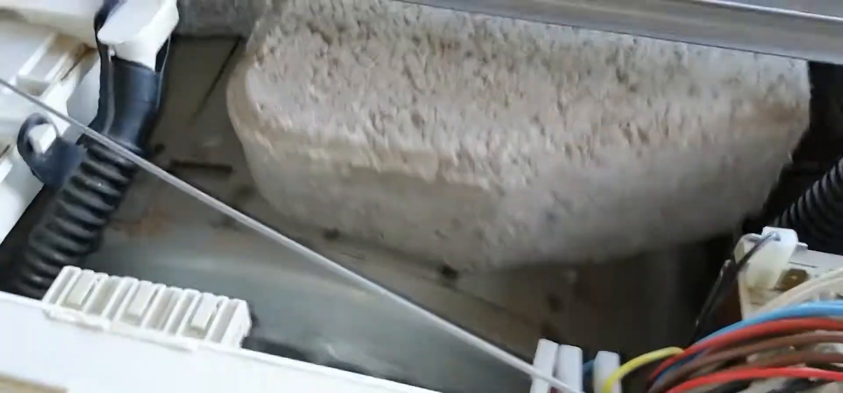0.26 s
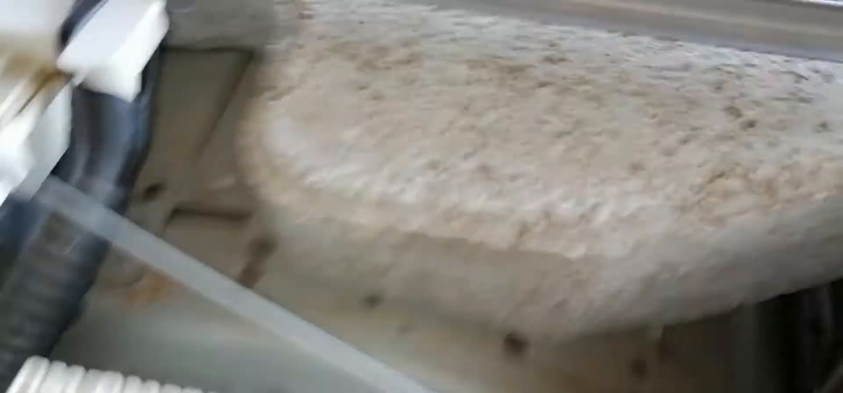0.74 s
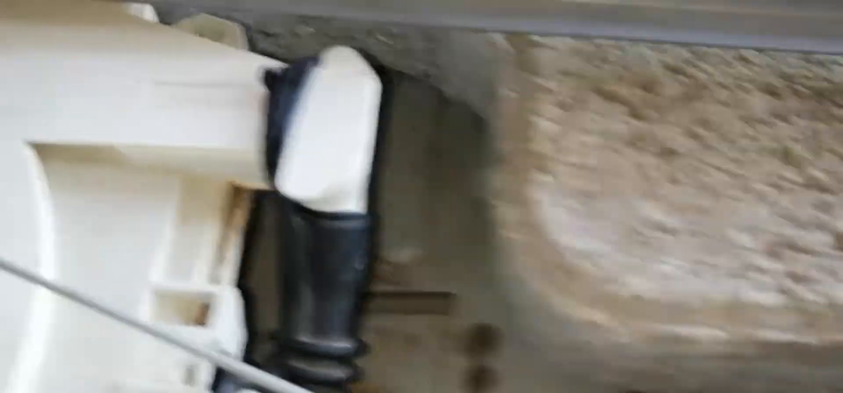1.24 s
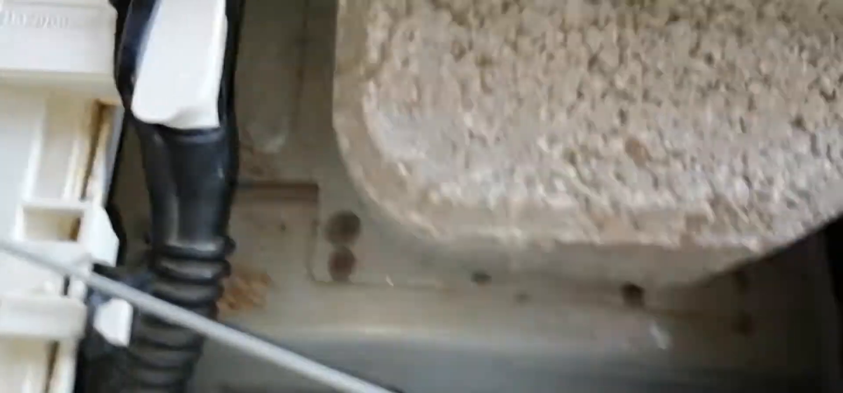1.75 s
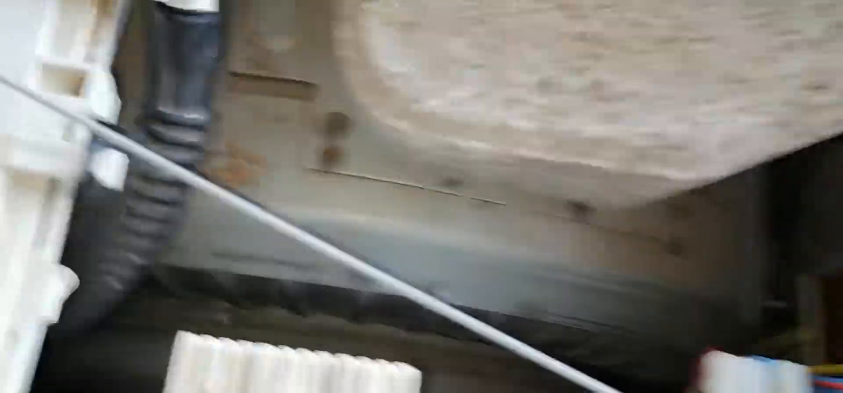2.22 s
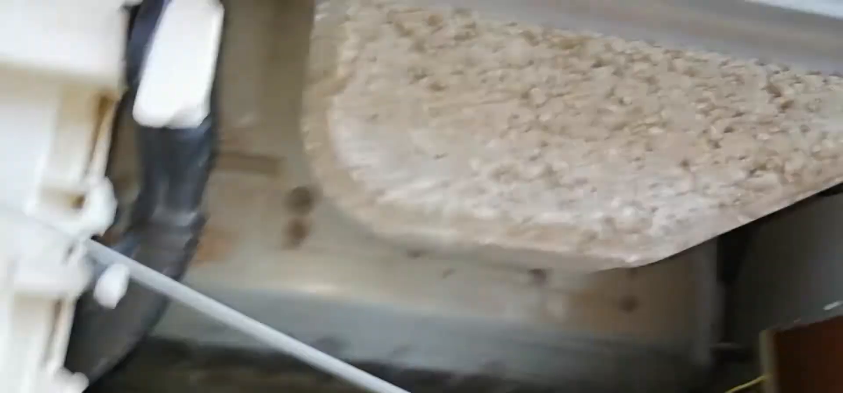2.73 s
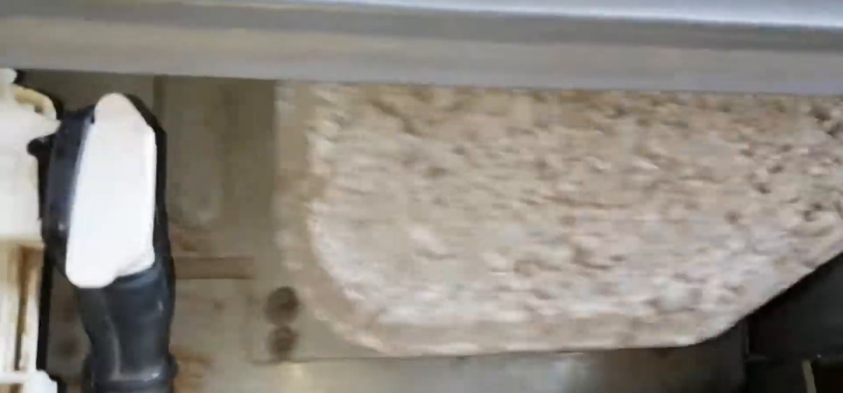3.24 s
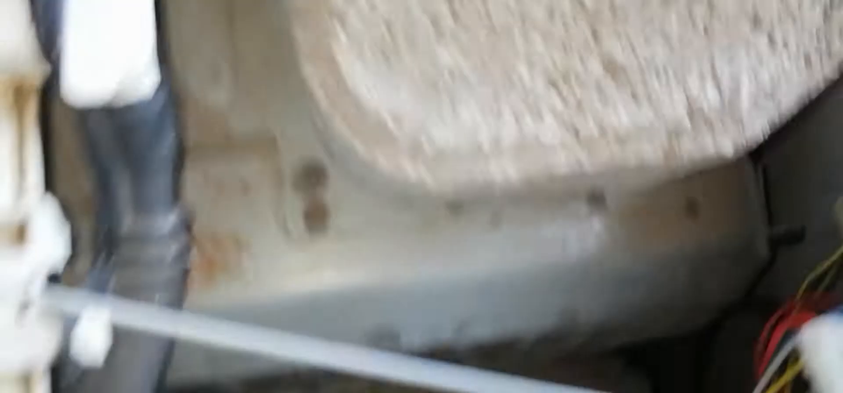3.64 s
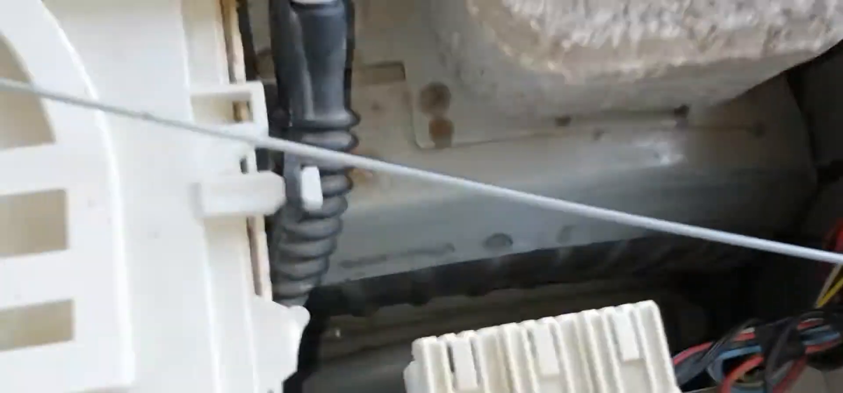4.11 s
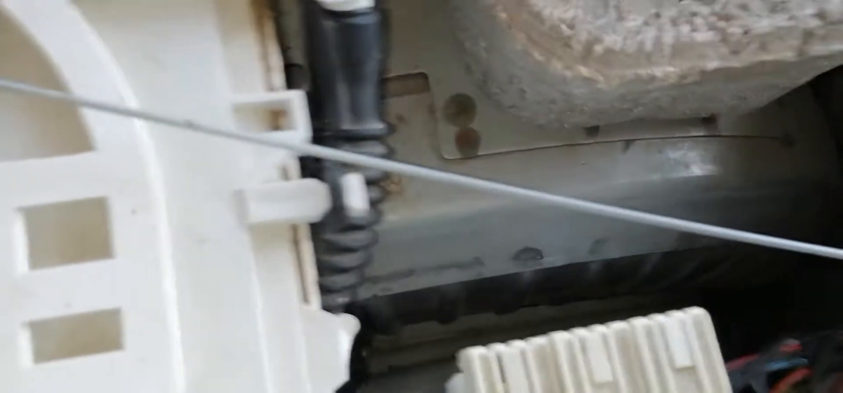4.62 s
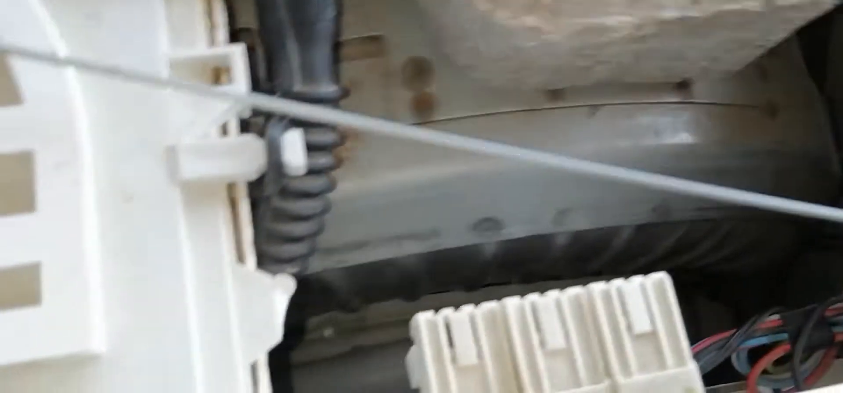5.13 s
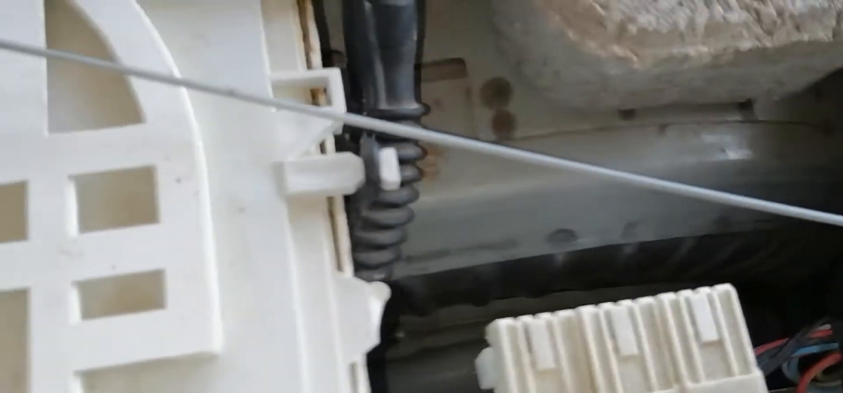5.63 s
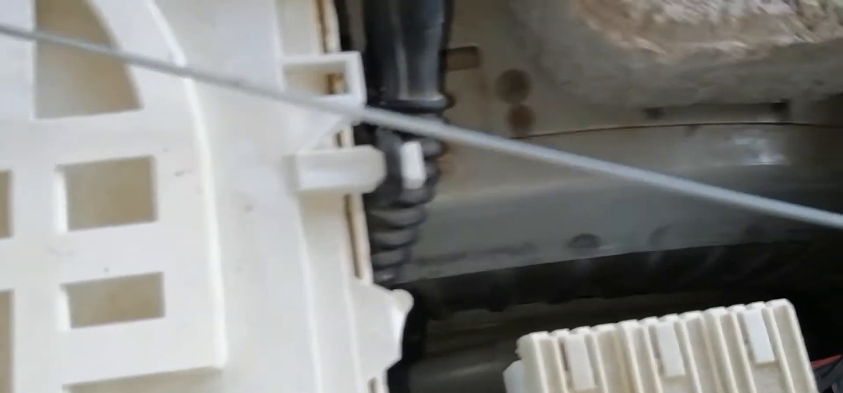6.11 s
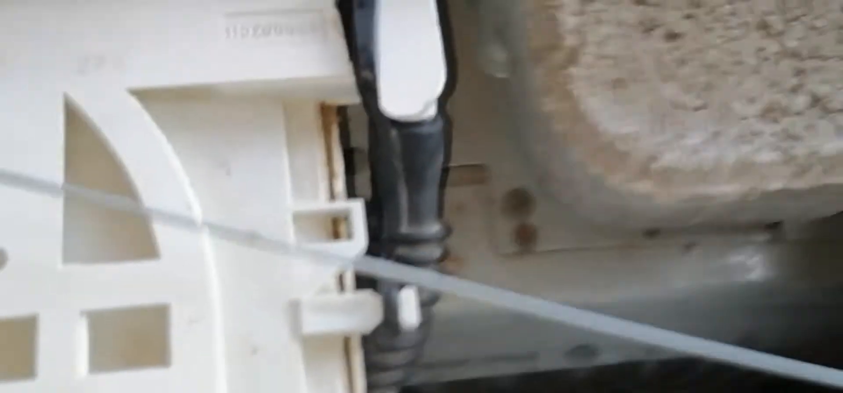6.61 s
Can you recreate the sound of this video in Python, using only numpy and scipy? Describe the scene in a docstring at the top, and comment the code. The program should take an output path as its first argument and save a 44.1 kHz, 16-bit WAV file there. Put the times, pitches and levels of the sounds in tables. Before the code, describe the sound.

Heard close from inside the cabinet, a washing machine drum spins with a steady rumble, a low motor hum and a faint hiss. The swinging tub first pounds out quick, rattling knocks that die down to light ticks. It then bumps a panel several times and drags along it in rough, squeaky surges with dull thumps. Finally the fast knocking comes back hard and gathers pace.

```python
"""Inside the cabinet of a washing machine, a load spins off balance. The swinging tub knocks on two
points of the housing in each turn. As it slows the knocks fade, and it bumps a side panel, then swings
wide and scrapes along it in loud surges. It speeds up and knocks again. Throughout, loose parts tick,
the drum rumbles, its bearings hiss and the motor hums."""
import sys
import numpy as np
from scipy import signal
from scipy.fft import rfft, irfft, next_fast_len
from scipy.io import wavfile
from scipy.ndimage import uniform_filter1d, map_coordinates

SR = 44100
rng = np.random.default_rng(int(sys.argv[2]) if len(sys.argv) > 2 else 0)


def int16_out(signal):
    """Quantize to a 16-bit WAV file."""
    q = np.round(np.clip(np.atleast_2d(signal).T, -1, 1) * 32767)
    wavfile.write(sys.argv[1], SR, q.astype(np.int16))


N = 302526
TIME = np.arange(N) / SR

# how far the tub swings towards the housing: t/s, swing/dB
TUB_SWING = [(0, -1.5), (.55, -1.5), (1.05, -1.5), (1.45, 0.5), (1.7, -0.5), (1.85, -8), (2.28, -6.5),
             (2.42, -10.5), (2.6, -14.5), (2.75, -15.5), (3.94, -16.5), (5.7, -15.5), (5.83, -10),
             (5.97, -0.5), (6.24, 1.5), (6.5, 4.5), (6.63, 2.5), (6.86, 3)]
# the swing needed to reach each of the two points: swing/dB
REACH_DB = [-9.5, -15]
# a knock's four parts (thump, body, clack, rattle): lowest f/Hz, highest f/Hz
PART_BANDS = [(150, 380), (380, 1400), (1400, 3500), (4200, 9000)]
# their base levels, a row per point: thump/dB, body/dB, clack/dB, rattle/dB
PART_LEVELS = [(-29, -31, -36.5, -41), (-32, -33.5, -37, -46)]
# what each gains from a wider swing, same layout: growth/(dB per dB)
PART_GROWTH = [(1.64, 0.84, 0.15, 1.74), (0.3, 0.65, 0.044, 0.27)]
# the knocks' tone drifts slowly over time, a list per point: t/s, thump/dB, clack/dB, rattle/dB
TONE_DRIFT = [
    [(0, 3, -2.5, -0.5), (.4, -2.5, 0.5, 1.5), (.75, 1, -0.5, -3.5), (1.05, -3, -1.5, 2.5),
     (1.44, 2.5, 3, -5.5), (1.7, 2.5, -1, -6), (2, 3.5, -1, 4.5), (2.27, 2, 2.5, -7), (2.45, 6, 12, -5),
     (5.83, 7, 12, 12), (5.97, -1, -3, -9.5), (6.24, 3.5, -0.5, -6), (6.5, -0.5, 1.5, -10.5),
     (6.62, -2, -2, -10), (6.75, -8.5, -5, -9)],
    [(0, -8, -2.5, .5), (.5, -6, -1, 0), (1, 0.5, -1, 0.5), (1.35, 6, -0.5, 0.5), (1.7, -5, -2, 2.5),
     (2, 1, -0.5, -2), (2.5, 4.5, 3, 0), (5.8, 6, -3.5, -4), (6.3, 7.5, 0.5, -5.5), (6.5, 9, -1, -2),
     (6.65, 2, -3, -8), (6.8, 3, -2, -6)],
]
# a dip that makes the knocks sound hollow: t/s, f/Hz, depth/dB
HOLLOW_DIP = [(0, 1480, 6), (.4, 1570, 2), (1, 1560, 9), (1.4, 1340, 7), (1.9, 1300, -0.5),
              (2.4, 1400, 4.5), (5.8, 1480, 1.5), (6.4, 1320, 5), (6.86, 1880, 0)]
def knocks(drift_per_s=0.749, thud_hz=(231.3, 270.5), rebound_s=0.076, restrike_s=0.017):
    """The tub hits the same two points, so knocks repeat closely. A wider swing hits harder."""
    out = np.zeros(N + SR)
    rings = np.array([[housing_ring(wash_db=-5, spread_db=3) for _ in range(8)] for _ in range(2)])
    t = np.arange(rings.shape[-1]) / SR
    punch = [0.35, 2.3, 1.5, 0.18]  # how far each part's first blow stands above its ring
    rise_s = [0.0019, 0.0038, 0.0039, 0.0009]
    sized = lambda x: x / np.std(x[:SR // 40])  # level set by the first 25 ms
    thuds = [sized(band(np.sin(2 * np.pi * hz * t) * fade(t, 0.077), 150, 1500)) for hz in thud_hz]
    controls = np.array(curves(TUB_SWING) + curves(HOLLOW_DIP) + curves(SWISH_PATH)[:1])
    tone = [np.array(curves(rows)) for rows in TONE_DRIFT]
    for s, point in blows():
        start = round(s * SR)
        swing_db, dip_hz, dip_db, swish_hz = controls[:, start]
        thump_db, clack_db, rattle_db = tone[point][:, start]
        # one ring slowly blends into the next
        which, blend = divmod(np.clip(s * drift_per_s, 0, 6), 1)
        angle = blend * np.pi / 2
        ring = np.cos(angle) * rings[point, int(which)] + np.sin(angle) * rings[point, int(which) + 1]
        ring += 0.24 * housing_ring(wash_db=5.5, spread_db=4.5)  # no two blows are quite alike
        colour = lambda hz: amp(2.5 * bump(hz, swish_hz, 0.32) - dip_db * bump(hz, dip_hz, 0.27))
        ring = filtered(ring, colour)
        ring += singing(ring, point, s)
        touch = 1 / (1 + np.exp((REACH_DB[point] - swing_db) / 0.5))  # a small swing misses
        softness = 2 ** (-np.clip(swing_db, -1, 4) / 5.5)  # a wide swing gives a sharper start
        levels_db = np.add(PART_LEVELS[point], [thump_db, 0, clack_db, rattle_db])
        levels_db += np.multiply(PART_GROWTH[point], swing_db)
        gains = touch * amp(levels_db + 1.54 * rng.standard_normal(len(PART_BANDS)))
        parts = []
        for k, edges in enumerate(PART_BANDS):
            blow = (1 + punch[k] * np.exp(-t / 0.0055)) * rise(t, softness * rise_s[k])
            parts.append(sized(band(ring[::-1], *edges)[::-1] * blow))  # backwards: no late start
        parts[0] = sized(parts[0] + amp(1.5) * thuds[point])  # the tub's own thud joins the thump
        thump, body, clack, rattle = gains[:, None] * parts
        add(out, s, thump + body + clack + rattle + chatter(body + clack + 0.5 * rattle))
        if point == 0:  # touched again, more dully
            add(out, s + restrike_s, amp(0.5) * (body + 0.5 * clack) * fade(t, 0.061))
        # the tub falls back on its dampers
        add(out, s + rebound_s, gains[0] * amp(-7) * thuds[point] * rise(t, 0.002))
    return out[:N]


# spells of knocking: start/s, end/s, starting speed/(turns per s), change/(turns per s per s)
KNOCK_SPELLS = [(.0455, 2.8, 8.372, -.662), (5.692, 6.8, 7.085, .87)]
def blows(lag_s=0.031):
    """The time and point of each blow: two per turn, as the drum slows or speeds up evenly."""
    for start, end, speed, change in KNOCK_SPELLS:
        age = np.arange(0, end - start, 1 / SR)
        turns = speed * age + change * age ** 2 / 2
        for s in np.interp(np.arange(turns[-1]), turns, start + age):
            yield s, 0
            yield s + lag_s, 1


# the notes the housing rings at: f/Hz, level/dB
HOUSING_NOTES = [(207, -5), (233, 5.5), (274, -7), (320, -4.5), (500, -3.5), (628, -5), (684, -4),
                 (834, -3), (950, -4), (1102, -2.5), (1235, -6.5), (1438, -36), (1560, -13.5),
                 (1655, -15.5), (1918, -15.5), (2010, -16), (2180, -14.5), (2465, -27), (2590, -38.5),
                 (2880, -28), (3050, -18.5), (3320, -28.5), (4480, -25.5), (4950, -18), (5356, -25.5),
                 (6132, -39)]
# the noisy wash between those notes: f/Hz, level/dB
WASH_COLOUR = [(88, -66), (150, -43), (234, -5.5), (385, -14), (658, -13), (762, -13), (960, -7.5),
               (1380, -19), (1650, -23), (1790, -23.5), (3800, -24.5), (5040, -32), (7000, -35),
               (7600, -46.5), (9880, -73), (16700, -120)]
# how long the wash takes to fall 60 dB (the notes last a little longer): f/Hz, t/s
RING_TIMES = [(200, 0.47), (500, 0.31), (1000, 0.18), (2500, 0.14), (6000, 0.055)]
def housing_ring(wash_db, spread_db, contact_s=0.014):
    """The struck housing rings with clear notes over a wash, dying once the tub lets go."""
    t = np.arange(SR // 4) / SR
    fall_db = lambda s, hz: 60 * np.maximum(s - contact_s, 0) / along(RING_TIMES, hz)
    notes = 0
    for hz, db in HOUSING_NOTES:
        luck, phase = rng.standard_normal(2)
        notes += amp(db + spread_db * luck - fall_db(t, hz) / 1.07) * np.sin(2 * np.pi * (hz * t + phase))
    hz, s, slices = signal.stft(coloured(rng.standard_normal(len(t)), WASH_COLOUR), SR, nperseg=256)
    ripple_db = 5 * rng.standard_normal((len(hz), 1)) * np.clip(hz / 1500, 0, 1)[:, None]
    wash = signal.istft(slices * amp(ripple_db - fall_db(s, hz[:, None])), SR, nperseg=256)[1]
    return unit(notes) + amp(wash_db) * unit(wash[:len(t)])


# notes that stand out: point (0 or 1), from t/s, to t/s, f/Hz, level/dB against the octave around it
SINGING_NOTES = [(0, 0, 1.24, 1115, -2.5), (0, 0, 1.79, 965, -6), (0, 0, 1.24, 640, -7),
                 (0, 0, 1.24, 540, -8), (0, 0, 1.24, 1945, -4), (0, 0, .96, 3520, -4),
                 (0, .24, .6, 2600, -5), (0, 1.24, 1.79, 1690, -3), (0, 1.24, 1.79, 680, -5),
                 (0, 1.11, 1.64, 3070, -6), (0, 1.11, 1.51, 3330, -6), (0, 1.38, 2.06, 2340, -5),
                 (0, 1.38, 1.76, 4260, -4), (0, 1.8, 2.36, 1620, 1), (0, 5.79, 6.69, 965, -4),
                 (0, 5.79, 6.69, 3070, -5), (0, 6.05, 6.66, 1690, -6), (0, 6.05, 6.66, 680, -6),
                 (0, 6.05, 6.66, 1920, -6), (0, 6.05, 6.66, 2880, -7), (0, 5.9, 6.05, 1560, -1),
                 (0, 6.69, 6.86, 1230, -8), (0, 6.69, 6.86, 1410, -9), (1, 0, .96, 2500, -2),
                 (1, 0, 1.64, 4250, -7), (1, .51, 1.79, 650, -6), (1, 1.01, 1.79, 2170, -2),
                 (1, 1.24, 1.79, 2980, -5), (1, 1.24, 1.64, 4980, -4), (1, 2.11, 2.66, 2900, -3),
                 (1, 2.24, 2.66, 3850, -7), (1, 2.24, 2.81, 2480, -5), (1, 5.69, 6.86, 2490, -6),
                 (1, 5.79, 6.86, 3020, -7), (1, 5.79, 6.69, 2180, -4)]
# how long they take to fall 60 dB: f/Hz, t/s
SINGING_TIMES = [(700, 0.29), (1900, 0.11), (2180, 0.21), (2500, 0.11), (5000, 0.1)]
def singing(ring, point, s):
    """Some of the cabinet's notes sing out in the knocks only during certain stretches of time."""
    t = np.arange(len(ring)) / SR
    hz = np.fft.rfftfreq(len(ring), 1 / SR)
    power = 2 * np.abs(rfft(ring)) ** 2 / len(ring)
    out = np.zeros(len(ring))
    for which, start, end, note_hz, db in SINGING_NOTES:
        if which == point and start <= s < end:
            detune, luck, phase = rng.standard_normal(3)
            tone = np.sin(2 * np.pi * (note_hz * (1 + 0.0055 * detune) * t + phase))
            tone *= fade(t, along(SINGING_TIMES, note_hz)) * rise(t, 0.0022)
            octave_size = np.sqrt(power[np.abs(np.log2((hz + 1) / note_hz)) < 0.5].sum())
            out += amp(db + 2.3 * luck) * octave_size * tone / np.linalg.norm(tone)
    return out


def chatter(knock, count=4, within_s=0.075):
    """A blow shakes the housing against its fittings, so a few small, short hits follow."""
    short = knock * fade(np.arange(len(knock)) / SR, 0.064)
    out = np.zeros(len(knock))
    for k, (when, size) in enumerate(rng.random((count, 2))):
        delay = within_s * (k + when) / count
        add(out, delay, amp(-9 - 105 * delay + 6 * (size - 0.5)) * short)
    return out


# drags along a side panel: hardest press t/s, length/s, groan f/Hz, level/dB, squeak f/Hz, level/dB
DRAGS = [(4.453, 0.066, 630, -32, 1420, -34.5), (4.63, 0.069, 700, -29.5, 1480, -36.5),
         (4.737, 0.025, 707, -27.5, 1490, -34.5), (4.809, 0.058, 530, -27.5, 1530, -32),
         (4.897, 0.054, 690, -23, 1760, -35.5), (4.984, 0.058, 680, -24.5, 1450, -31),
         (5.076, 0.054, 700, -23.5, 2100, -33.5), (5.162, 0.058, 603, -25, 1430, -32.5),
         (5.267, 0.069, 533, -23.5, 1490, -35.5), (5.364, 0.02, 500, -40, 1450, -41),
         (5.466, 0.024, 620, -32, 1400, -56)]
def scrapes(slips_per_s=260, grit=0.64):
    """The tub sticks and slips along the panel; the jerks ring it as the pressure swells and falls."""
    out, t = np.zeros(N), np.arange(-SR // 7, SR // 7) / SR
    slip_rate = slips_per_s * np.exp(0.5 * wobble(slips_per_s / 2))
    slips = np.diff(np.floor(np.cumsum(slip_rate) / SR), prepend=0) * amp(4 * wobble(150))
    jerks = unit(band(slips, 240, 14000)) + grit * rng.standard_normal(N)
    catches = unit(amp(2.6 * wobble(170)))  # coarser catches make the level shudder
    for s, length, groan_hz, groan_db, squeak_hz, squeak_db in DRAGS:
        span = round(s * SR) + np.arange(len(t)) - len(t) // 2
        press = np.hanning(len(t)) / np.sqrt(1 + np.abs(2 * t / length) ** 4.5)
        groan, squeak = side_panel(jerks[span], groan_hz, squeak_hz)
        groan, squeak = amp(groan_db) * groan, amp(squeak_db) * squeak
        # the squeak needs more pressure than the groan
        out[span] += press * (groan * np.sqrt(catches[span]) + np.sqrt(press) * squeak * catches[span])
        # the low and middle notes ring on as the tub lets go
        tail = filtered(groan + 0.5 * squeak, lambda hz: 1 / (1 + (hz / 1900) ** 10))
        tail *= fade(np.maximum(t - length / 2, 0), 0.2)
        out[span] += amp(-15) * tail * (1 - press) * (t > 0)
    return out


# the notes the side panel rings at: f/Hz, width/Hz, level/dB
PANEL_NOTES = [(348, 310, -8), (478.6, 44, 2), (621, 37, -5), (785, 42, 1.5), (1000, 82, -7.5),
               (1285, 66, -3), (1530, 190, -13), (1652, 19, -4), (1809, 48, -10.5), (2384, 103, -11),
               (2710, 110, -21), (3280, 230, -21), (4680, 380, -30)]
# its rough rasp: f/Hz, level/dB
RASP_COLOUR = [(88, -64), (150, -44), (271, 22), (474, 3), (567, -38), (788, -10.5), (929, -7),
               (1650, -15.5), (1760, -22.5), (2370, 0), (3300, -14.5), (7600, -62.5), (9880, -99),
               (16700, -120)]
def side_panel(push, low_hz, high_hz):
    """The panel's low and high ring, each at an even level; the spot touched favours some notes."""
    chance = rng.standard_normal((len(PANEL_NOTES), 2))
    notes = [(hz * (1 + 0.012 * detune), width, db + 2.5 * luck)
             for (hz, width, db), (detune, luck) in zip(PANEL_NOTES, chance)]
    ring = unit(resonate(push, notes)) + amp(-5.5) * coloured(push, RASP_COLOUR)
    low = filtered(band(ring, 230, 1050), lambda hz: amp(-8 * np.abs(np.log2((hz + 1) / low_hz))))
    high = filtered(band(ring, 1250, 9000), lambda hz: amp(6 * bump(hz, high_hz, 0.42)))
    return evened(low), evened(high)


# single panel notes during the drags: t/s, f/Hz, level/dB
HOWL_NOTES = [(4.455, 414, -33.5), (4.455, 522, -36), (4.455, 812, -33.5), (4.465, 1641, -34),
              (4.635, 812, -35), (4.64, 1257, -33), (4.635, 1652, -33), (4.741, 333, -36.5),
              (4.741, 780, -29), (4.803, 481, -27), (4.815, 780, -29), (4.81, 1396, -36), (4.89, 384, -38),
              (4.9, 444, -34), (4.912, 804, -28.5), (4.905, 1022, -31.5), (4.986, 468, -30),
              (4.99, 616, -38), (4.993, 785, -34.5), (5.075, 473, -30), (5.085, 624, -28),
              (5.088, 724, -30), (5.088, 783, -33), (5.165, 438, -40), (5.172, 624, -30.5),
              (5.255, 465, -22.5), (5.275, 621, -38), (5.285, 796, -38)]
def howls(swell_s=0.019, ring_times=((450, 0.24), (1250, 0.17), (1650, 0.09))):
    """Each drag presses on another spot, so other panel notes swell roughly and ring out."""
    out, t = np.zeros(N), np.arange(-SR // 10, SR // 5) / SR
    waver_hz, rough = 13 * wobble(90), amp(2.5 * wobble(140))
    swell = np.exp(-(np.minimum(t, 0) / swell_s) ** 2)
    for s, hz, db in HOWL_NOTES:
        span = round(s * SR) - SR // 10 + np.arange(len(t))
        pitch_hz = hz + waver_hz[rng.integers(N - len(t)):][:len(t)]
        tone = np.sqrt(2) * np.sin(2 * np.pi * (np.cumsum(pitch_hz) / SR + rng.random()))
        ring_out = fade(np.maximum(t - swell_s / 2, 0), along(ring_times, hz))
        out[span] += amp(db) * swell * ring_out * rough[span] * tone
    return out


# hard catches during the drags: t/s, level/dB, f/Hz
HARD_CATCHES = [(4.824, -28, 800), (4.887, -18, 480), (4.905, -19.5, 760), (4.918, -23.5, 790),
                (4.994, -24, 560), (5.071, -16, 450), (5.086, -19, 720), (5.141, -24, 1000),
                (5.185, -17.5, 680), (5.253, -16, 470)]
def jolts():
    """The tub catches hard: a short, dull thump with a little crack on top."""
    out, t = np.zeros(N), np.arange(SR // 16) / SR
    for s, db, centre_hz in HARD_CATCHES:
        colour = lambda hz: bump(hz, centre_hz, 1) + 0.098 * bump(hz, 1800, 0.91)
        ring = evened(filtered(rng.standard_normal(len(t)), colour), samples=300)
        add(out, s, amp(db) * ring * fade(t, 0.04) * rise(t, 0.0025))
    return out


# bumps on the side panel: t/s, low ring level/dB, high ring level/dB
PANEL_TAPS = [(3.396, -28, -37.5), (3.555, -30.5, -38.5), (3.715, -29.5, -34.5), (3.878, -27.5, -36),
              (4.383, -24.5, -34.5), (4.558, -29, -35.5), (4.712, -48, -36), (5.443, -26, -36.5)]
def taps():
    """The slower tub bumps the panel and lets it ring out."""
    out, t = np.zeros(N), np.arange(SR // 3) / SR
    for s, low_db, high_db in PANEL_TAPS:
        low, high = side_panel(rng.standard_normal(len(t)), low_hz=710, high_hz=1750)
        add(out, s, (amp(low_db) * low + amp(high_db) * high) * fade(t, 0.16) * rise(t, 0.0042))
    return out


# the clearer clicks of loose parts: t/s, level/dB, f/Hz
CLEAR_CLICKS = [(0.476, -37, 1800), (.488, -33, 1480), (1.497, -43, 6500), (2.403, -43, 3000),
                (2.548, -46, 4200), (2.691, -43.5, 3340), (2.839, -48, 3800), (2.984, -57, 5200),
                (3.138, -51, 2600), (3.941, -42.5, 2960), (3.949, -35, 1800), (4.129, -63, 3600),
                (4.978, -42, 6800)]
def loose_parts(ticks_per_s=15):
    """Fasteners and wires shaken by the tub: a few clear clicks among faint random ticks."""
    out, t = np.zeros(N), np.arange(SR // 20) / SR
    hz = np.fft.rfftfreq(len(t), 1 / SR)
    ticks = [(when * N / SR, -60 - 2.5 * np.log(1 - 0.97 * size), 3900 * 2 ** (1.6 * (pitch - 0.5)))
             for when, size, pitch in rng.random((int(ticks_per_s * N / SR), 3))]
    for s, db, centre_hz in CLEAR_CLICKS + ticks:
        colour = bump(hz, centre_hz, 0.51) + 0.12 * (hz > 1200)
        ring = unit(irfft(rfft(rng.standard_normal(len(t))) * colour, len(t)))
        add(out, s, amp(db) * ring * fade(t, 0.031))
    return out


# light touches on the tub: t/s, level/dB
LIGHT_TOUCHES = [(2.74, -63), (2.89, -62.5), (3.05, -63.5), (3.19, -62), (3.35, -66), (3.52, -66),
                 (4.34, -62)]
def brushes():
    """Something light brushes the turning tub, making short, grainy swells of high hiss."""
    hiss = unit(filtered(rng.standard_normal(N), lambda hz: bump(hz, 5050, 0.16)))
    swells = sum(amp(db) * np.exp(-((TIME - s) / 0.03) ** 2) for s, db in LIGHT_TOUCHES)
    return hiss * swells * amp(4 * wobble(160))


# a swish that sinks as the drum slows: t/s, f/Hz, base level/dB
SWISH_PATH = [(0, 5630, -61), (.8, 6340, -63.5), (1.2, 4900, -62.5), (1.5, 4530, -60.5), (1.9, 4680, -61),
              (2.25, 3330, -52.5), (2.6, 2910, -57.5), (3, 2600, -72)]
def swish(width_octaves=0.16, settle_s=0.035):
    """A narrow band of hiss slides down and fades; each blow stirs it up."""
    hz, s, slices = signal.stft(rng.standard_normal(N), SR, nperseg=256)
    centre_hz, level_db = curves(SWISH_PATH)
    octaves = np.log2((hz[:, None] + 1) / np.interp(s, TIME, centre_hz))
    hiss = signal.istft(slices * np.exp(-0.5 * (octaves / width_octaves) ** 2), SR, nperseg=256)[1][:N]
    kicks = np.bincount([round(s * SR) for s, point in blows()], minlength=N)[:N]
    stirred = amp(-7) + 2 * signal.lfilter([1], [1, -np.exp(-1 / (settle_s * SR))], kicks)
    return unit(hiss) * stirred * amp(level_db + 3 * wobble(34))


# the noise of the running drum: f/Hz, level/dB
DRUM_COLOUR = [(13, -32.5), (22, -10), (35, -10.5), (64, -7), (125, 8.5), (172, -2), (273, -9.5),
               (366, -13), (445, -11), (569, -14.5), (951, -20.5), (1180, -32.5), (1930, -44),
               (2290, -38.5), (3830, -51.5), (5270, -48.5), (7600, -50), (9880, -78), (16700, -120)]
# its deep sounds: t/s, sway level/dB, drone base level/dB (the motor follows this too)
DEEP_LEVELS = [(0.0, -63.5, -33.5), (0.07, -50, -45), (0.57, -53.5, -47.5), (1.09, -61, -37),
               (1.76, -49.5, -40), (2.98, -46, -38.5), (3.92, -53, -40), (4.41, -50.5, -46),
               (4.87, -54, -34), (4.91, -55, -42), (5.79, -45.5, -37), (6.86, -72, -38.5)]
# its higher sounds: t/s, rumble level/dB, hiss level/dB
RUNNING_LEVELS = [(0, -43, -49.5), (.8, -43.5, -51), (1.6, -40, -52.5), (2.4, -43.5, -51.5),
                  (3, -39.5, -52.5), (3.7, -42, -54), (4.3, -41.5, -53.5), (4.7, -41, -53),
                  (5.2, -38.5, -51.5), (5.55, -35.5, -51), (5.9, -39, -49), (6.4, -36.5, -52),
                  (6.86, -41.5, -51)]
def drum():
    """The turning drum sways, drones and rumbles while its bearings and belt hiss."""
    sway_db, drone_db = curves(DEEP_LEVELS)
    rumble_db, hiss_db = curves(RUNNING_LEVELS)
    noise = lambda lo, hi: unit(band(coloured(rng.standard_normal(N), DRUM_COLOUR), lo, hi))
    flutter = wobble(25)  # shared by rumble and hiss
    sway = amp(sway_db) * noise(22, 64)
    drone = amp(drone_db - 2.5) * noise(80, 165)
    housing = unit(resonate(noise(190, 770), [(hz, 28, db / 2) for hz, db in HOUSING_NOTES]))
    rumble = amp(rumble_db + 2 * flutter) * (noise(239, 1700) + amp(-6.5) * housing)
    hiss = amp(hiss_db + 0.4 * flutter + 1.5 * wobble(90)) * noise(1216, 7500)
    return sway + drone + rumble + hiss


# the motor's hum: f/Hz, level/dB against the drone base level
HUM_NOTES = [(53, -18.5), (118, -9.5), (198, -9.5), (232, -16), (274, -9.5)]
def motor(waver_hz=2.31, throb_db=5):
    """The motor hums with low notes that waver under the uneven load."""
    hum = 0
    for hz, db in HUM_NOTES:
        level = amp(db + throb_db * wobble(12))
        hum += level * np.sin(2 * np.pi * np.cumsum(hz + waver_hz * wobble(9)) / SR)
    return hum * amp(curves(DEEP_LEVELS)[1])


def amp(db):
    """Turns decibels into a number to multiply by."""
    return 10 ** (np.asarray(db) / 20)


def unit(x):
    """Scales x to an average (rms) level of 1."""
    return x / np.sqrt(np.mean(x ** 2) + 1e-20)


def evened(x, samples=700):
    """Evens out quick changes in level."""
    return x / np.sqrt(np.abs(uniform_filter1d(x ** 2, samples)) + 1e-12)


def fade(t, fall_s):
    """Dies away by 60 dB every fall_s seconds."""
    return amp(-60 * t / fall_s)


def rise(t, rise_s):
    """Climbs smoothly from 0 towards 1."""
    return 1 - np.exp(-t / rise_s)


def add(out, s, sound):
    """Mixes a sound into out, starting at s seconds."""
    span = out[round(s * SR):][:len(sound)]
    span += sound[:len(span)]


def curves(rows):
    """One value per sample for each column after the time."""
    s, *columns = np.transpose(rows)
    return [np.interp(TIME, s, column) for column in columns]


def along(points, hz):
    """Reads between (f/Hz, value) points, spaced by pitch."""
    f, values = np.transpose(points)
    return np.interp(np.log(hz + 1), np.log(f + 1), values)


def bump(hz, centre_hz, octaves):
    """A bell-shaped hill around one pitch."""
    return np.exp(-(np.log2((hz + 1) / centre_hz) / octaves) ** 2)


def wobble(rate):
    """A smooth curve through `rate` random values a second."""
    return map_coordinates(rng.standard_normal(int(N * rate / SR) + 4), [TIME * rate])


def filtered(x, response):
    """Multiplies each frequency in x by response(hz)."""
    n = x.shape[-1]
    padded = next_fast_len(n + SR // 2)
    return irfft(rfft(x, padded) * response(np.fft.rfftfreq(padded, 1 / SR)), padded)[..., :n]


def coloured(x, spectrum):
    """Shapes x by (f/Hz, level/dB) points, then scales it to level 1."""
    return unit(filtered(x, lambda hz: amp(along(spectrum, hz))))


def resonate(x, notes):
    """Makes x ring at (f/Hz, width/Hz, level/dB) notes."""
    peak = lambda f, hz, width: 1j * f * width / (hz * hz - f * f + 1j * f * width)
    return filtered(x, lambda f: sum((-1) ** k * amp(db) * peak(f, hz, width)
                                     for k, (hz, width, db) in enumerate(notes)))


def band(x, lo, hi):
    """Keeps the frequencies between lo and hi."""
    return signal.sosfilt(signal.butter(4, [lo, hi], 'band', fs=SR, output='sos'), x)


def scene():
    """Everything sounds close by inside the cabinet, on one channel."""
    tub = knocks() + taps() + scrapes() + howls() + jolts()
    return (tub + loose_parts() + brushes() + swish() + drum() + motor())[None]


def record(dry):
    """Cuts the treble steeply above 7450 Hz."""
    return filtered(dry, lambda hz: amp(-np.clip((hz - 7450) / 14, 0, 120)))


dry = scene()
out = record(dry)
int16_out(out)
```